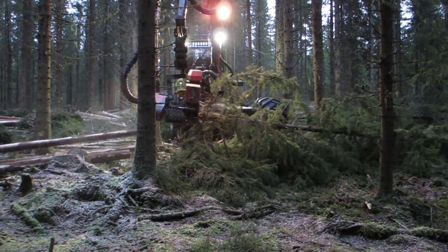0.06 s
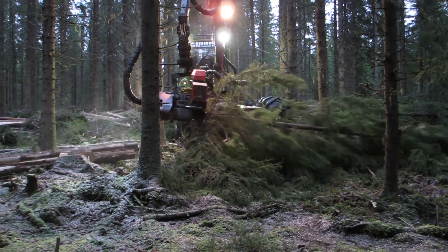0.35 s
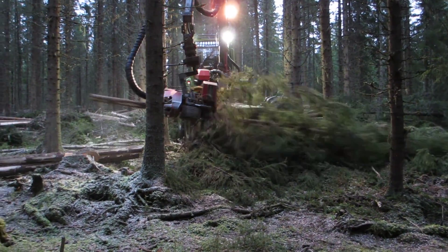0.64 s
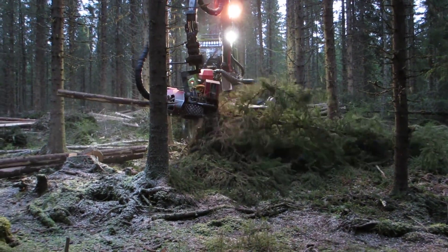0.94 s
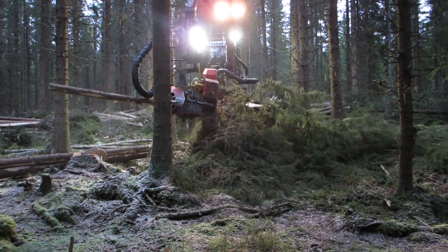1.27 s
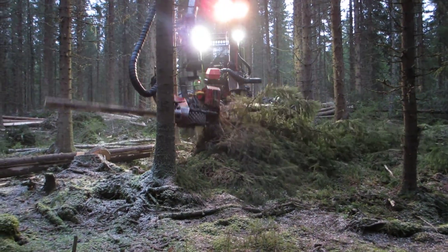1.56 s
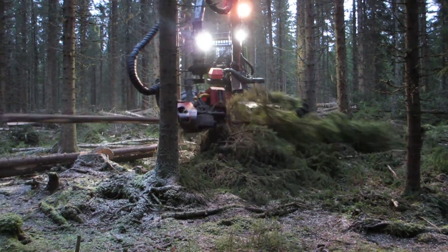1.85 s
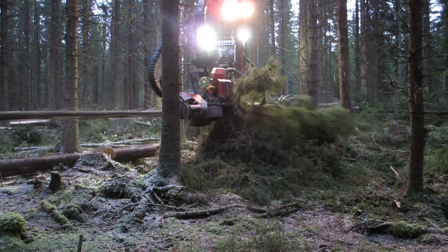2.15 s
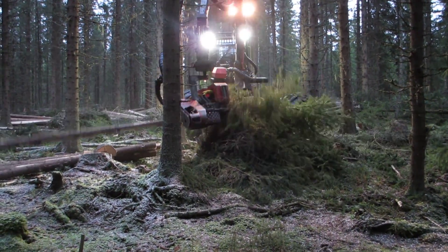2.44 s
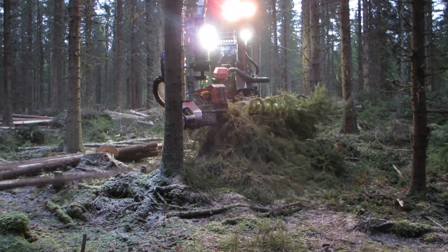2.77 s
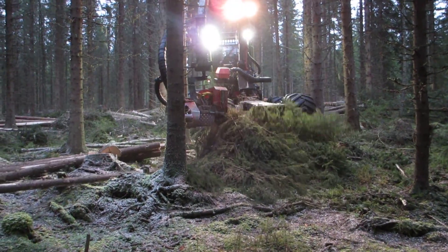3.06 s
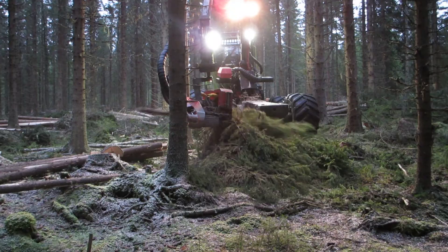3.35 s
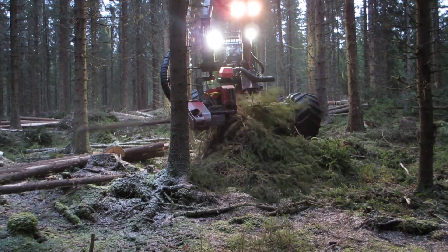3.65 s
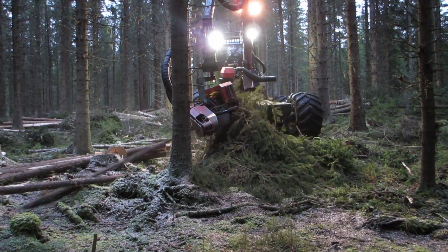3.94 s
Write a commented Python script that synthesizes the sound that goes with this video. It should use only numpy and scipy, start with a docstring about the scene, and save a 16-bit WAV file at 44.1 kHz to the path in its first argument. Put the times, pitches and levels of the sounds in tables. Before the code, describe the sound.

A forestry harvester crunches branches off a tree and saws it, its diesel engine droning.

```python
"""In a spruce wood, some way off, a forestry harvester works. Its diesel drones and sags under load.
Three times the rollers drag the stem through the knives: brittle fracture makes branches crunch and snap,
stick-slip friction makes the wood groan and squeak, and impacts knock the steel head. Oil hisses in valves.
Between the last two pulls the chain saw bites the log in whining surges, and its rasp swells and dies away.
The trunks scatter a short reverberation."""
import sys
import numpy as np
from scipy import signal
from scipy.fft import rfft, irfft
from scipy.io import wavfile
from scipy.ndimage import uniform_filter1d

SR = 44100
rng = np.random.default_rng(int(sys.argv[2]) if len(sys.argv) > 2 else 0)


def inscribe(sig):
    """Save sig as 16-bit PCM at rate SR to the path in sys.argv[1].

    A 1-D sig is mono; a 2-D sig holds one channel per row.
    Samples are clipped to [-1, 1] before scaling.
    """
    pcm = np.round(np.clip(np.atleast_2d(sig).T, -1, 1) * 32767)
    wavfile.write(sys.argv[1], SR, pcm.astype(np.int16))


N = 176400
TIME = np.arange(N) / SR
PADDED = 2 ** 18
FREQS = np.maximum(np.arange(PADDED // 2 + 1) * SR / PADDED, 1)

# Levels are relative; T60 is the time to decay by 60 dB.
# the diesel's running: t/s, firing rate f/Hz, level/dB
ENGINE = [(0, 63.8, -35), (.24, 63.1, -31), (.43, 60, -30.5), (.86, 60.4, -28.5), (1.1, 63.4, -30.5),
          (1.48, 60.2, -25.5), (1.71, 64, -26), (1.87, 60.4, -28), (2.25, 60.7, -26.5), (2.42, 63.5, -29),
          (2.69, 58.9, -29), (2.87, 63.8, -27), (3.12, 64, -31.5), (3.4, 60.4, -26.5), (3.85, 61, -26),
          (4, 61, -28)]
# engine and pump tones: multiple of the firing rate, level/dB, roughness
ENGINE_TONES = [(2 / 3, -27, .21), (1, -1.3, .15), (2, -2.7, .12), (7 / 3, -19, .5), (19 / 6, -12.5, .55),
                (13 / 3, -21.5, .43), (19 / 3, -25.5, .4), (31 / 3, -20, .62), (50 / 3, -28, .24)]
# spectrum of the fan and hydraulic rush: f/Hz, level/dB
RUSH_SPECTRUM = [(25, -43.5), (60, 3), (150, -1.5), (270, -1.5), (480, -7), (640, -4.5), (760, -7.5),
                 (1050, -6.5), (1600, -22), (2700, -33.5), (4000, -45.5), (8000, -51.5), (15000, -51)]
# knocks on the steel head: t/s, level/dB
CLUNKS = [(0.089, -21.5), (2.993, -22)]
# modes of the head: f/Hz, level/dB, T60/s
HEAD_MODES = [(406, 4.5, 0.068), (457.3, -1, 0.13), (593, -7, 0.08), (840, -8.5, 0.092), (1147, -5, 0.076),
              (1347, -3.5, 0.0338)]
# branches snapping: t/s, level/dB
SNAPS = [(0.14, -38.5), (0.273, -28), (0.2934, -29), (0.3116, -25), (0.353, -17), (0.3954, -22.5),
         (0.43, -26), (0.4776, -25.5), (0.54, -28), (0.63, -25), (0.672, -24.5), (0.742, -34),
         (0.7672, -27), (0.8092, -21.5), (0.822, -32), (1.85, -25.5), (1.857, -23.5), (1.8917, -18),
         (2.01, -29.5), (2.04, -28), (2.0758, -23.5), (2.2173, -24.5), (3.1965, -40), (3.241, -26.5),
         (3.322, -31), (3.35, -31), (3.393, -26.5), (3.403, -27), (3.475, -38.5), (3.489, -31.5),
         (3.5146, -26.5), (3.568, -32), (3.6413, -28), (3.696, -34)]
# spectrum of a snap: f/Hz, level/dB
SNAP_SPECTRUM = [(200, 1), (700, 16), (1400, -21), (2100, 12.5), (2900, 11.5), (3800, 0), (5200, 7),
                 (6500, -1), (8000, 3.5), (12000, 1), (16000, -9)]
# the stem slipping in the rollers: t/s, duration/s, initial f/Hz, final f/Hz, level/dB
GROANS = [(.186, .102, 264, 238, -26.5), (.23, .058, 165, 140, -27), (.318, .032, 385, 372, -30),
          (.415, .04, 335, 328, -30)]
# branches slipping on the knives: t/s, nominal f/Hz, level/dB
SQUEAKS = [(.292, 2950, -37), (.311, 2800, -38), (.353, 2950, -41), (.525, 3020, -43), (.539, 3020, -43),
           (.629, 3080, -43)]
# one envelope for each pull of the stem: t/s, crunch level/dB, twig level/dB
PULLS = [
    [(.23, -55, -84), (.272, -26.5, -50), (.42, -24.5, -45), (.53, -22.5, -43), (.602, -29.5, -51),
     (.65, -23.5, -44), (.715, -32.5, -50), (.81, -25, -46), (.88, -29, -49.5), (.912, -30.5, -72.5),
     (1, -34.5, -72)],
    [(1.67, -56, -91), (1.7, -34, -51.5), (1.79, -23, -47), (1.86, -25.5, -42.5), (1.978, -30, -52),
     (2.03, -25, -42.5), (2.144, -24.5, -50.5), (2.224, -25.5, -51), (2.34, -46, -80)],
    [(3.14, -42.5, -71), (3.17, -34.5, -68), (3.205, -22.5, -38), (3.33, -26.5, -47.5), (3.41, -20, -51),
     (3.53, -25.5, -47), (3.63, -23, -51), (3.69, -25.5, -48), (3.8, -19, -53.5), (3.9, -27.5, -54),
     (4, -38, -55)],
]
# spectrum of breaking wood: f/Hz, level/dB
CRUNCH_SPECTRUM = [(90, -20.5), (170, 3), (300, 3), (500, 2), (750, 3.5), (1250, -2), (1650, -12.5),
                   (2200, -24.5), (2900, -23.5), (3700, -33.5), (7000, -55.5), (15000, -69)]
# spectrum of breaking twigs: f/Hz, level/dB
TWIG_SPECTRUM = [(800, 0), (2000, 19), (3000, 11), (3800, 9.5), (5000, 6), (6500, 0), (8000, 0), (12500, 6),
                 (16000, -9)]
# resonances that ring while the head feeds, the highest a hydraulic whine near 2.5 kHz: f/Hz, bandwidth/Hz,
# level/dB
FEED_RESONANCES = [(563, 31, -7), (791, 15, -9), (1072, 9, -9.5), (2502, 98, -14.5)]
# oil flowing in the valves: opening t/s, closing t/s
FLOWS = [(.25, 3.01), (3.165, 4)]
# spectrum of the oil's hiss: f/Hz, level/dB
HISS_SPECTRUM = [(1500, -27), (4000, 1), (8000, -5.5), (13000, 7), (16000, -15)]
# heavy wood meeting steel: t/s, level/dB
BLOWS = [(.257, -21), (.373, -16), (.405, -15), (.652, -12.5), (.746, -14), (1.697, -14), (1.853, -9),
         (2.038, -13), (3.156, -22)]
# spectrum of a blow: f/Hz, level/dB
BLOW_SPECTRUM = [(120, -23), (300, 5), (700, 8), (1300, 3.5), (2100, -16), (2900, -16.5), (4000, -27.5),
                 (12000, -49)]
# the rollers gripping the stem: t/s, level/dB
GRIPS = [(0.304, -13)]
# modes of the stem: f/Hz, level/dB, T60/s
STEM_MODES = [(80, -2.5, 0.077), (150.6, -9, 0.33), (255, -7, 0.075)]
# thick limbs splitting: t/s, level/dB
CRACKS = [(.405, -22), (.919, -18.5), (1.697, -23)]
# spectrum of a split: f/Hz, level/dB
CRACK_SPECTRUM = [(400, -8), (1150, 9), (1700, -2.5), (2900, -17.5), (4500, -30), (12000, -48)]
# the saw's teeth biting: t/s, duration/s, initial f/Hz, final f/Hz, level/dB
SAW_SURGES = [(2.4, .014, 730, 750, -30), (2.432, .011, 800, 820, -23), (2.449, .019, 1300, 1450, -26),
              (2.477, .018, 1070, 1040, -25), (2.5, .07, 1800, 1640, -34), (2.507, .016, 930, 900, -27),
              (2.528, .029, 880, 840, -19.5), (2.617, .036, 1030, 1070, -22),
              (2.657, .033, 1090, 1120, -29), (2.743, .043, 1190, 1020, -22.5),
              (2.818, .042, 760, 730, -30), (2.872, .045, 700, 640, -38)]
# harmonics of the whine: multiple, level/dB
SAW_HARMONICS = [(1, 0.5), (2, -22.5)]
# spectrum of the chain's rasp and chip spray: f/Hz, level/dB
RASP_SPECTRUM = [(200, -33), (430, 4), (570, -1.5), (800, 3), (1300, 2.5), (1800, -20), (2500, -17.5),
                 (3500, -17), (5000, -32), (7000, -31), (9000, -25), (12500, -19.5), (16000, -30.5)]
# resonances of the saw bar: f/Hz, bandwidth/Hz, level/dB
BAR_RESONANCES = [(1027, 14, -5.5), (1585, 62, -12), (2370, 76, -23.5), (4010, 36, -30)]
# scatter from the trunks: f/Hz, level/dB
TRUNK_SCATTER = [(60, -11), (500, -9.5), (1200, -14), (2500, -8), (6000, -6.5), (15000, -17.5)]
# balance of the microphone pair: f/Hz, left minus right level/dB
PORT_BALANCE = [(110, 11.5), (200, 8), (380, 9), (700, 4), (1000, 2), (1300, -3.5), (1550, -10), (2400, -1),
                (3100, -6), (4600, 0), (8000, -1.5), (10500, -6.5), (15000, -3)]
# phase between the microphones: f/Hz, left minus right phase/rad
PORT_PHASE = [(40, -2), (110, -3.5), (260, -2), (700, -1.81), (1000, -2), (1400, -2.5), (1650, -2),
              (2100, -2), (2450, -7.5), (3250, -7), (3850, -11.5), (5900, -14), (6800, -12.5),
              (9000, -14.5), (15500, -14)]


def from_db(db):
    """Amplitude ratio of a level in decibels."""
    return 10 ** (np.asarray(db) / 20)


def rms_one(x):
    """Normalisation to unit rms."""
    return x / np.sqrt(np.mean(x ** 2) + 1e-20)


def in_time(rows):
    """Linear interpolation of each column at every sample."""
    s, *columns = np.transpose(rows)
    return [np.interp(TIME, s, c) for c in columns]


def during(start, end):
    """A rectangular gate with smoothed edges."""
    return uniform_filter1d(1. * ((TIME >= start) & (TIME <= end)), size=256)


def over_hz(points):
    """Interpolation on a logarithmic frequency axis."""
    hz, value = np.transpose(points)
    return np.interp(np.log(FREQS), np.log(hz), value)


def colour(x, spectrum):
    """Minimum-phase filtering by the folded cepstrum; white noise keeps its power."""
    cepstrum = irfft(np.log(rms_one(from_db(over_hz(spectrum)))))
    cepstrum[1:PADDED // 2] *= 2
    cepstrum[PADDED // 2 + 1:] = 0
    return irfft(rfft(x, PADDED) * np.exp(rfft(cepstrum)))[:N]


def drift(hz):
    """Random fluctuation: low-pass noise of unit rms."""
    return rms_one(irfft(rfft(rng.standard_normal(PADDED)) / (1 + (FREQS / hz) ** 2))[:N])


def grains(per_s, spread_db):
    """Shot noise of random fractures, many small and few large."""
    sizes = from_db(spread_db * np.minimum(rng.exponential(1, N), 5)) * rng.choice([-1, 1], N)
    return rms_one(sizes * (rng.random(N) < per_s / SR))


def bursts(events, t60):
    """Exponentially decaying noise at each event."""
    kicks = np.zeros(N)
    for s, db in events:
        kicks[int(s * SR)] += from_db(db)
    envelope = signal.lfilter([1], [1, -from_db(-60 / (t60 * SR))], kicks + 1e-18)
    return envelope * rng.standard_normal(N)


def struck(events, modes, contact_s=0.0047):
    """Free vibration: each contact excites a body's damped modes."""
    out = np.zeros(N)
    for s, db in events:
        age = np.maximum(TIME - s, 0)
        for hz, mode_db, t60 in modes:
            envelope = from_db(db + mode_db - 60 * age / t60) * np.minimum(age / contact_s, 1)
            out += envelope * np.sin(2 * np.pi * (hz * age + rng.random()))
    return out


def resonate(x, resonances):
    """Forced vibration of parallel two-pole resonators."""
    out = 0
    for hz, width, db in resonances:
        r = np.exp(-np.pi * width / SR)
        poles = [1, -2 * r * np.cos(2 * np.pi * hz / SR), r * r]
        out += from_db(db) * np.sqrt((1 - r * r) / 2) * signal.lfilter([1, 0, -1], poles, x + 1e-18)
    return out


def glides(rows, harmonics, jitter, rough, edge_s=.003):
    """Short gliding tones with random frequency and amplitude modulation."""
    out = np.zeros(N)
    wobble = 1 + jitter * drift(124)
    flutter = 1 + rough * drift(200)
    for s, length, from_hz, to_hz, db in rows:
        age = TIME[:int((length + edge_s) * SR)]
        span = int(s * SR) + np.arange(len(age))
        hz = np.interp(age, [0, length], [from_hz, to_hz]) * wobble[span]
        phase = 2 * np.pi * np.cumsum(hz) / SR
        tone = sum(from_db(db + part_db) * np.sin(k * phase) for k, part_db in harmonics)
        edges = np.minimum(np.minimum(age, age[::-1]) / edge_s, 1)
        out[span] += edges * flutter[span] * tone
    return np.sqrt(2) * out


def engine():
    """Periodic firing sets the exhaust and pump tones and modulates the broadband rush."""
    hz, db = in_time(ENGINE)
    firing_phase = 2 * np.pi * np.cumsum(hz) / SR
    tones = 0
    for multiple, tone_db, rough in ENGINE_TONES:
        phase = multiple * firing_phase + 2 * np.pi * rng.random()
        tone = (1 + rough * drift(24)) * np.sin(phase) + rough * drift(26) * np.cos(phase)
        tones += from_db(db + tone_db) * tone
    throb = 1 + 0.13 * np.sin(firing_phase)
    rush = colour(rng.standard_normal(N) * throb, RUSH_SPECTRUM)
    return np.sqrt(2) * tones + rush * from_db(-36.5 + 0.35 * (db - db.mean()))


def head_clunks():
    """Impact excites the normal modes of the steel head."""
    return struck(CLUNKS, HEAD_MODES)


def branch_snaps(ring_t60=0.021):
    """Brittle fracture: a crack, a tail of splinters and four damped modes for each branch."""
    splinters = bursts(SNAPS, t60=0.017) + from_db(-13) * bursts(SNAPS, t60=0.07)
    rings = np.zeros(N)
    age = TIME[:SR // 10]
    for (s, db), modes_hz in zip(SNAPS, 2400 * 4 ** rng.random((len(SNAPS), 4))):
        start = int(s * SR)
        ring = np.sin(2 * np.pi * np.outer(modes_hz, age)).sum(axis=0)
        rings[start:start + len(age)] += from_db(db - 60 * age / ring_t60) * ring
    return from_db(-6.5) * colour(splinters, SNAP_SPECTRUM) + from_db(-26) * rings


def rubbing(squeak_s=0.0065, squeak_tuning=0.967):
    """Stick-slip friction: the stem groans in the rollers, branches squeak on the knives."""
    groans = glides(GROANS, [(1, 0)], jitter=0.017, rough=0.26)
    slips = [(s, squeak_s, hz, hz, db) for s, hz, db in SQUEAKS]
    return groans + glides(slips, [(squeak_tuning, 0)], jitter=0.025, rough=0.15)


def delimbing():
    """Clustered fractures: twigs crackle, and crunching wood rings the head's resonances and a hydraulic whine
    near 2.5 kHz."""
    crunch_gain, twig_gain = 0, 0
    for pull in PULLS:
        crunch_db, twig_db = in_time(pull)
        moving = during(pull[0][0], pull[-1][0])
        crunch_gain += moving * from_db(crunch_db - 1.38)
        twig_gain += moving * from_db(twig_db - 3)
    clumps = drift(34)
    fractures = crunch_gain * rms_one(grains(per_s=2200, spread_db=2.4) * from_db(.8 * clumps))
    crackle = grains(per_s=1500, spread_db=3.5)
    needle_hiss = .5 * rng.standard_normal(N)
    twigs = twig_gain * rms_one((crackle + needle_hiss) * from_db(1.8 * clumps))
    head_ring = from_db(-11.5) * resonate(fractures, FEED_RESONANCES)
    return colour(fractures, CRUNCH_SPECTRUM) + head_ring + colour(twigs, TWIG_SPECTRUM)


def hydraulics():
    """Flow noise: oil hisses through the valves while they are open."""
    valves_open = sum(during(*flow) for flow in FLOWS)
    return from_db(-72.5) * colour(rng.standard_normal(N), HISS_SPECTRUM) * valves_open


def blows():
    """Impact of heavy wood on steel: a brief crack over a more slowly decaying thud."""
    crack = from_db(-5) * bursts(BLOWS, t60=0.065)
    thud = from_db(-11.5) * bursts(BLOWS, t60=0.21)
    return colour(crack + thud, BLOW_SPECTRUM)


def stem_thump():
    """The rollers' grip excites the low normal modes of the stem."""
    return struck(GRIPS, STEM_MODES)


def limb_cracks():
    """Fracture of a thick limb releases a burst of mid-frequency noise."""
    return colour(bursts(CRACKS, t60=0.072), CRACK_SPECTRUM)


def saw(start_s=2.397, attack_s=0.085, release_s=2.661, stop_s=3.005, decay_db_per_s=66):
    """Periodic tooth impacts whine in surges; the shot noise of chips rasps and rings the bar."""
    whine = glides(SAW_SURGES, SAW_HARMONICS, jitter=.028, rough=.38)
    attack = np.sqrt(np.clip((TIME - start_s) / attack_s, 0, 1))
    decay = from_db(-decay_db_per_s * np.maximum(TIME - release_s, 0))
    spray = rms_one(grains(per_s=10000, spread_db=1.0) * from_db(0.57 * drift(50)))
    chips = attack * decay * during(start_s, stop_s) * spray
    rasp = from_db(-26) * colour(chips, RASP_SPECTRUM)
    return whine + rasp + from_db(-26.5) * resonate(chips, BAR_RESONANCES)


def forest(x, t60=0.32):
    """Scattering by the trunks gives each side its own short reverberant tail."""
    decay = from_db(-60 * TIME / t60)
    tails = np.array([rms_one(rng.standard_normal(N) * decay) for _ in range(2)]) / np.sqrt(N)
    return irfft(rfft(x, PADDED) * rfft(tails, PADDED) * from_db(over_hz(TRUNK_SCATTER)))[:, :N]


def scene():
    """Superposition of the machine's direct sound and the scattered field."""
    wood = delimbing() + branch_snaps() + limb_cracks() + rubbing() + blows() + stem_thump()
    machine = engine() + hydraulics() + wood + saw() + head_clunks()
    return machine + forest(machine)


def record(dry, fade_s=.004, cutoff_hz=16000):
    """Level and phase differences between two microphone ports give stereo; a low-pass cuts the top."""
    ratio = from_db(over_hz(PORT_BALANCE))
    left = ratio * np.exp(1j * over_hz(PORT_PHASE))
    ports = np.array([left, np.ones_like(ratio)]) / np.sqrt((1 + ratio ** 2) / 2)
    soft_ends = np.minimum(np.minimum(TIME, TIME[::-1]) / fade_s, 1)
    heard = from_db(5.0) * irfft(rfft(dry * soft_ends, PADDED) * ports)[:, :N]
    return signal.sosfilt(signal.ellip(12, .1, 80, cutoff_hz, fs=SR, output="sos"), heard)


dry = scene()
out = record(dry)
inscribe(out)
```